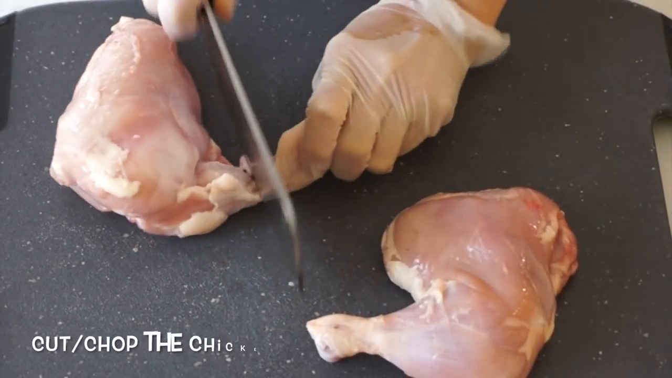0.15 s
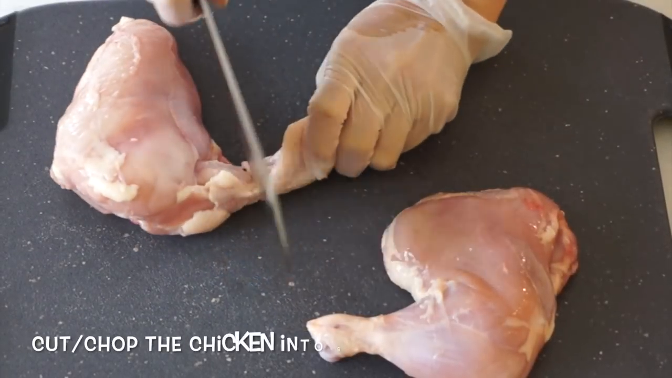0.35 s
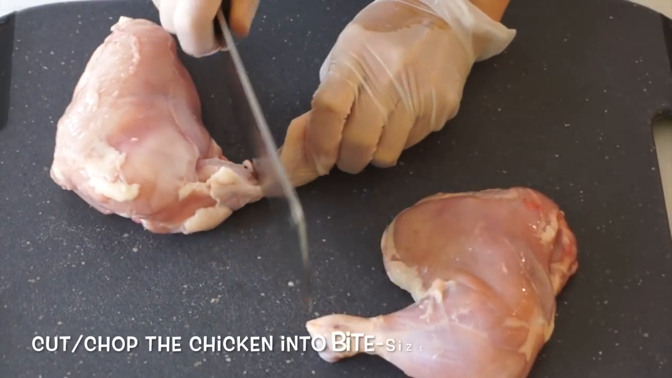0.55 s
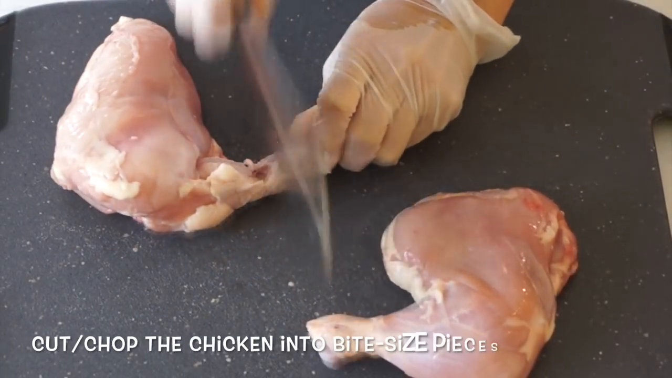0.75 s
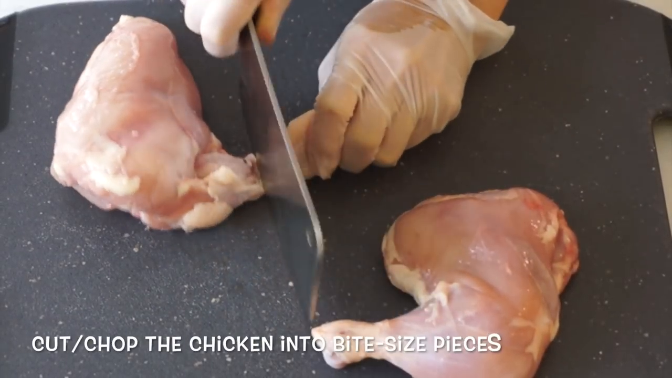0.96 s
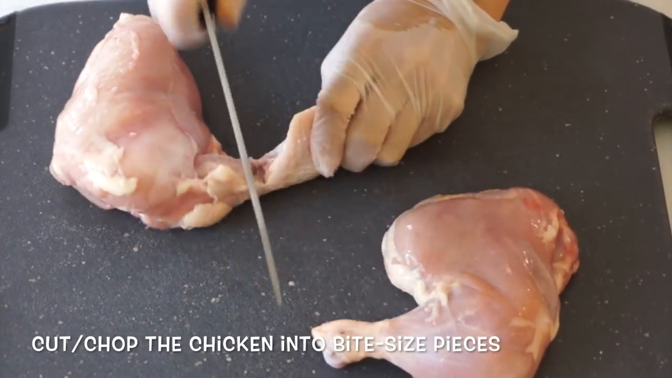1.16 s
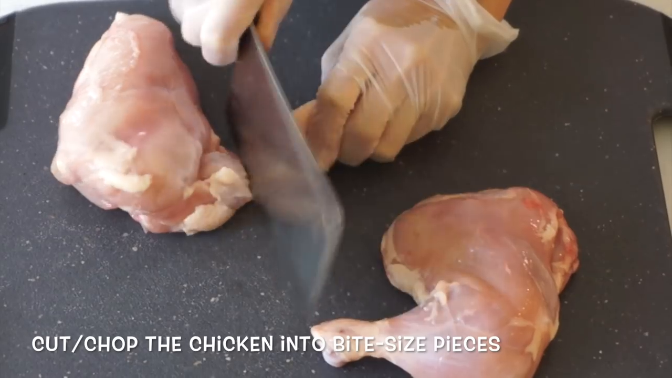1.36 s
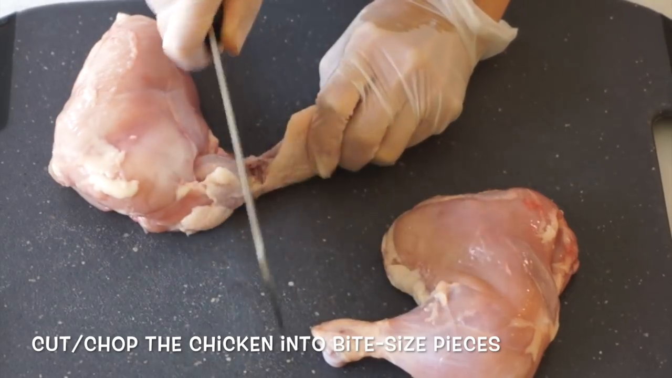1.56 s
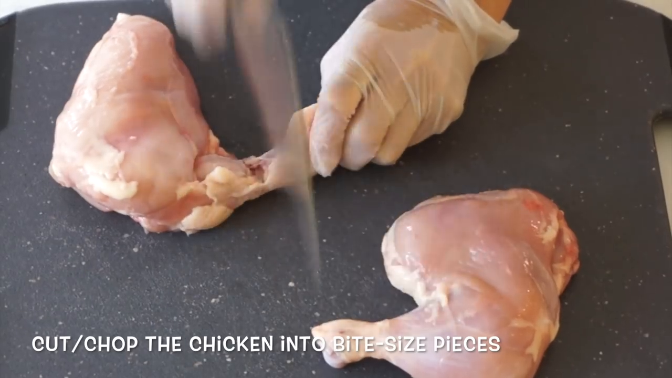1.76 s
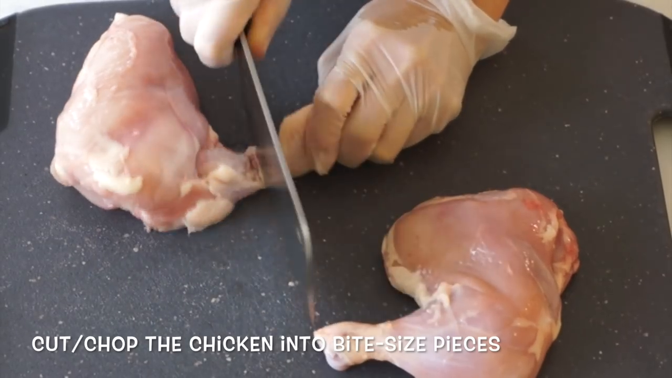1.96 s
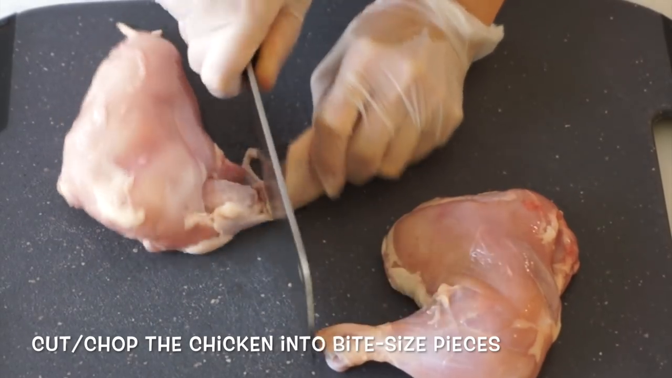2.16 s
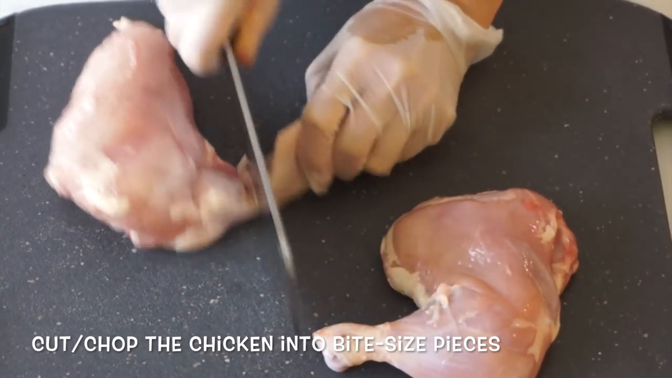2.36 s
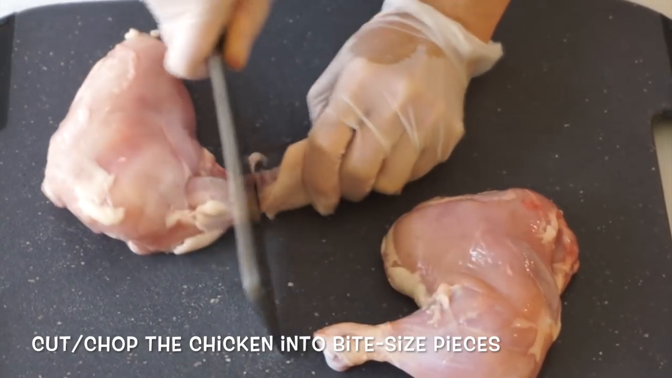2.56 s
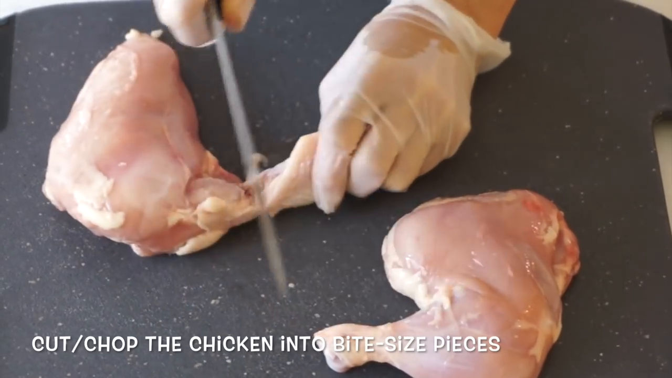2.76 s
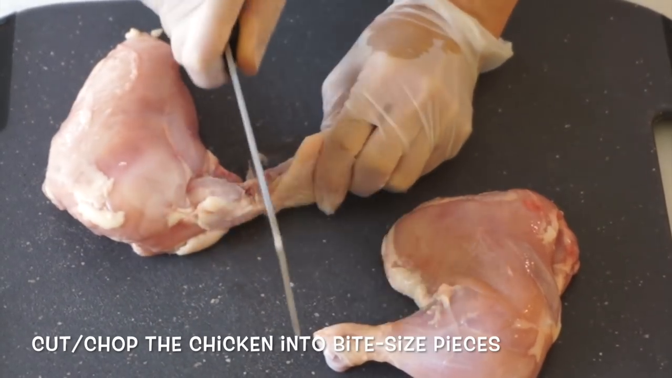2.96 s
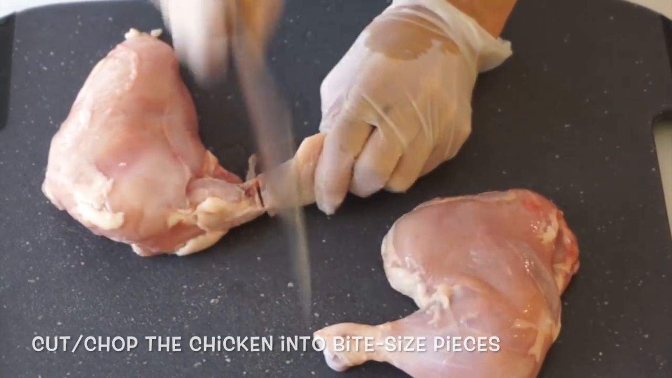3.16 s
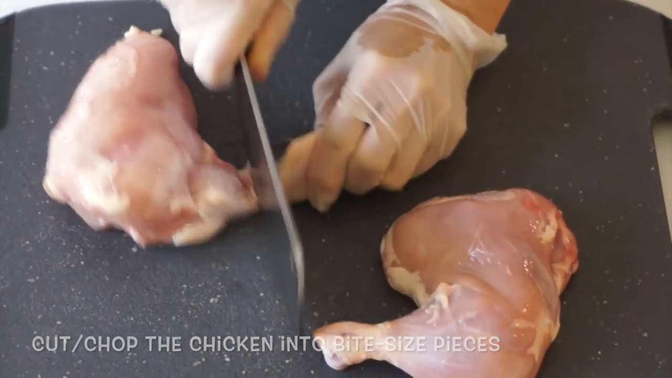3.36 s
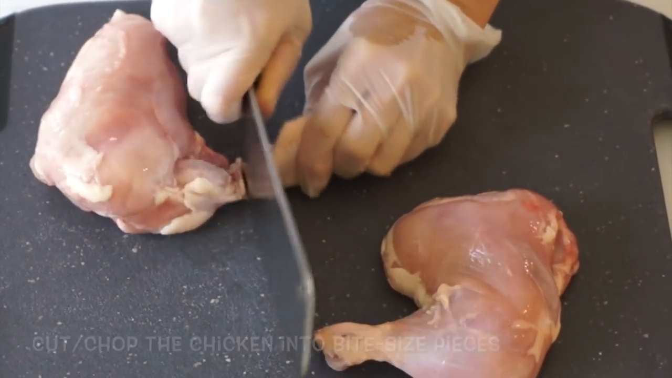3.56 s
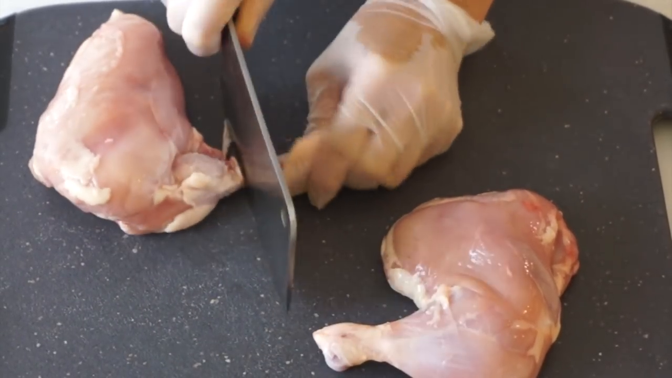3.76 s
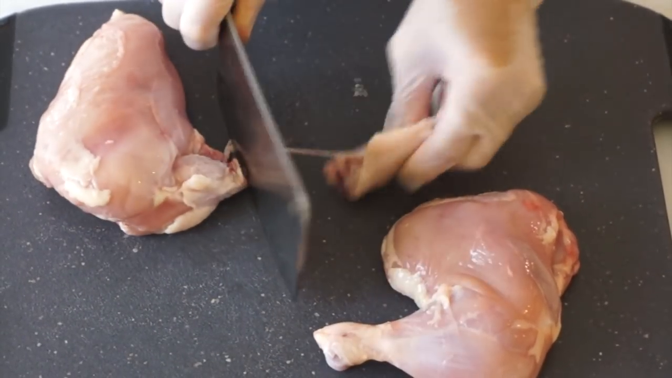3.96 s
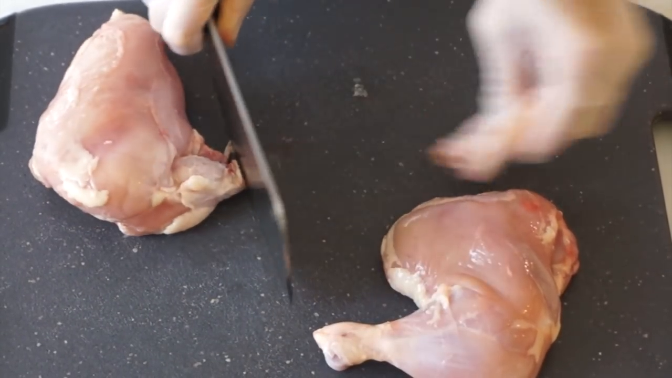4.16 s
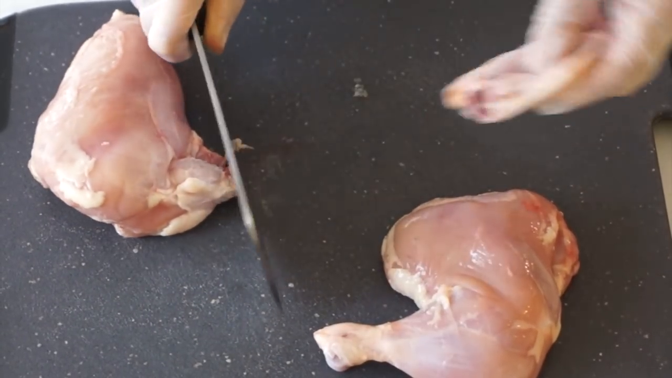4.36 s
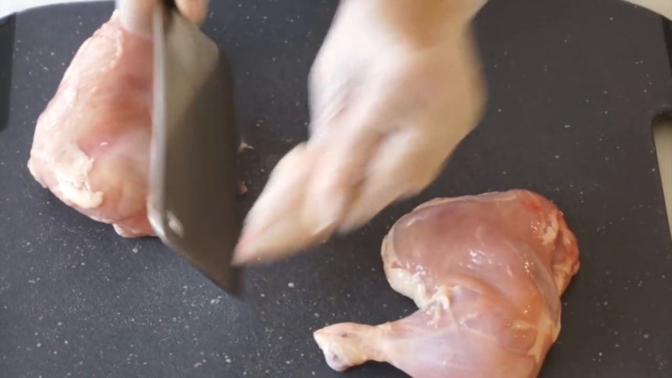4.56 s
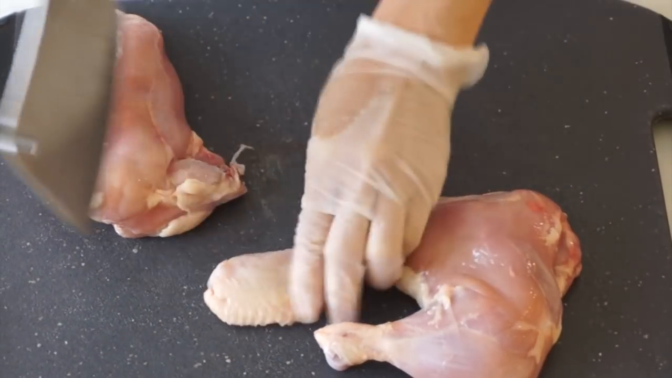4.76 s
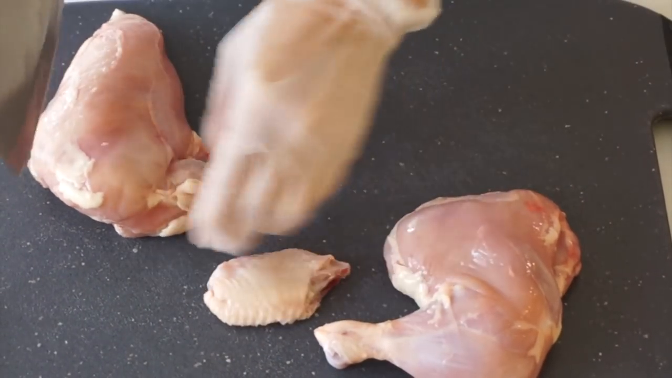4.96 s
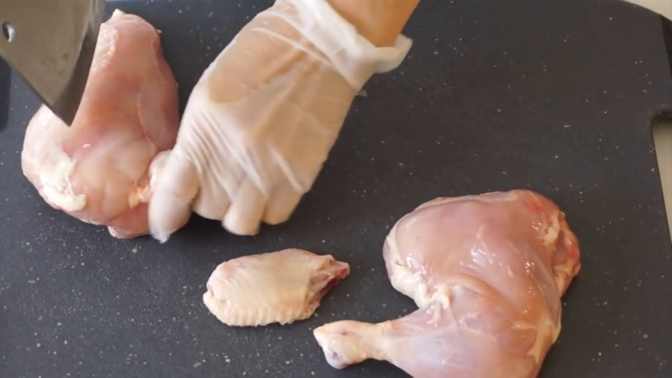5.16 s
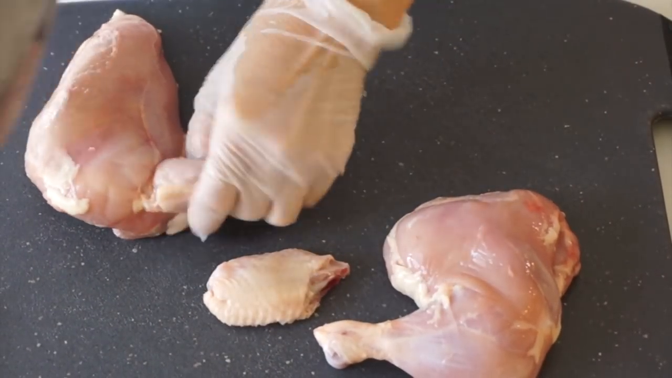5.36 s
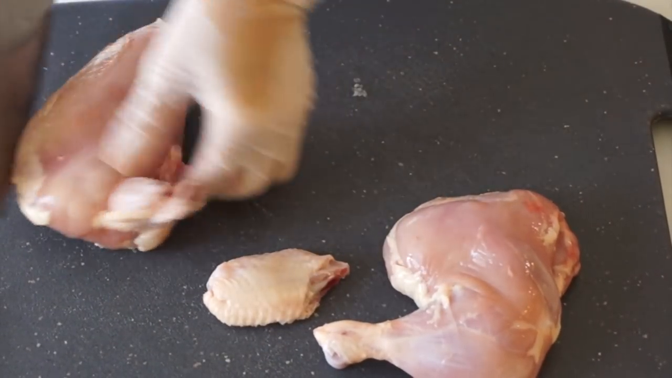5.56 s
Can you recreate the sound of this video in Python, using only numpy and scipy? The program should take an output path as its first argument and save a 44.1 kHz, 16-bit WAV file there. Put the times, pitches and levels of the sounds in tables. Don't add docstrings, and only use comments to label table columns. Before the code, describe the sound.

Six uneven cleaver blows crack and knock on a cutting board in a hard-walled kitchen, followed by quiet handling of meat with plastic gloves.

```python
import sys
import numpy as np
from scipy import signal
from scipy.fft import rfft, irfft
from scipy.io import wavfile
from scipy.ndimage import uniform_filter1d

SR = 44100
rng = np.random.default_rng(int(sys.argv[2]) if len(sys.argv) > 2 else 0)


def undo_db(level):
    steps = np.asarray(level, float) / 20
    return 10 ** steps


def dump_mix(stems):
    frames = np.atleast_2d(stems).T
    limited = np.clip(frames, -1, 1)
    pcm = np.round(limited * 32767).astype(np.int16)
    wavfile.write(sys.argv[1], SR, pcm)


N = 247401

# frequency in Hz, level in dB per Hz.
AIR = [(15, -90), (25, -57.5), (60, -50.5), (197, -20.5), (293, -10), (335, -11.5), (485, -7.5),
       (525, -11.5), (991, -12.5), (1130, -13), (2140, -23.5), (2780, -28.5), (3260, -33), (9170, -39.5),
       (14000, -38.5)]
# frequency in Hz, level in dB.
HUM = [(74, -30.5), (231, -17), (300, -10), (392, -21), (437, -9.5), (486, -3)]
# frequency in Hz, likeness from 0 to 1.
LIKENESS = [(60, 0.78), (300, .97), (700, 0.89), (1400, .8), (3000, 0.82), (6500, 0.76), (14000, 0.98)]
# peak time in seconds,
# rustle level in dB, swell in seconds, fade in seconds, scrape level in dB over the rustle.
STROKES = [(.0, -73, .1, .3, 12), (.06, -64, .03, .12, 2), (.164, -59, .16, .19, 9), (.33, -74, .2, .15, 8),
           (2.12, -71, .1, .1, 15), (2.17, -56.5, .065, .08, 4.5), (2.366, -59.5, .35, .055, 6),
           (2.42, -55, .02, .25, 5), (2.74, -74, .3, .7, 3), (3.44, -47, .03, .07, 10),
           (3.5, -48, .035, .09, 8), (3.685, -57, .14, .12, 13), (3.76, -77, .1, .3, 18),
           (3.88, -63, .1, .115, -2), (4.764, -67, .027, .165, 3), (5.062, -65.5, .035, .09, 8),
           (5.126, -51.5, .03, .14, -1), (5.24, -66, .1, .2, 5), (5.436, -55, .076, .19, -2),
           (5.61, -58, .12, .1, 4)]
# time in seconds, level in dB, swell in seconds, fade in seconds.
STRETCH = (2.216, -56.5, .012, .35)
# start in seconds, peak in dB, centre in Hz, T60 in seconds,
# width in octaves.
SNAPS = [(.061, -50, 7400, 0.026, .06), (.061, -54, 10200, 0.028, .06), (.0746, -55, 7500, .02, .1),
         (2.0234, -50, 11500, .012, .2), (2.2194, -42, 12600, 0.014, 0.23), (2.257, -56, 5500, .01, 0.17),
         (2.4127, -38.5, 10400, 0.0089, 0.29), (2.5436, -51, 11500, .01, .2),
         (3.2065, -30.5, 5930, 0.0054, 0.94), (3.2105, -35, 9100, 0.0063, .6),
         (3.4094, -46, 12000, .01, .2), (3.4296, -31, 10600, 0.01, 0.53), (3.4296, -26, 5800, 0.016, .2),
         (3.495, -36, 7400, 0.0086, .6), (3.646, -41, 11000, .008, .35), (3.6566, -44, 9000, 0.012, .2),
         (3.8437, -58, 8000, .012, .5), (4.4744, -66, 8500, .01, .15), (4.6843, -57, 12000, .01, .2),
         (4.7072, -58, 11500, .01, .25), (4.758, -61, 6000, .012, .6), (5.225, -53, 9000, .012, .5),
         (5.3153, -58, 12000, .012, .2)]
# start in seconds, peak in dB, centre in Hz,
# T60 in seconds, width in octaves.
TAPS = [(1.898, -36, 960, .04, 0.33), (1.943, -31, 885, .03, 0.57), (2.017, -42.5, 2940, .03, 0.17),
        (2.127, -44.5, 3070, 0.043, .2), (2.326, -42, 3550, 0.015, 0.35), (2.42, -50, 3600, .03, 0.35),
        (2.5225, -36.5, 1070, 0.015, 0.54), (2.53, -42, 980, 0.038, .5), (2.545, -49, 2900, .02, .15),
        (3.207, -28, 1480, 0.011, 0.45), (3.494, -37, 2900, .017, 0.28), (3.812, -53, 2800, 0.023, .25),
        (3.843, -57, 2000, .025, .3), (4.758, -50, 2200, 0.016, .6), (5.04, -54, 2500, .02, 0.41),
        (5.05, -47, 1090, .06, 0.74), (5.062, -44, 975, 0.094, 0.39), (5.08, -48, 1080, .06, .5),
        (5.375, -64, 4770, .1, .2), (5.41, -56.5, 4200, 0.23, 0.25), (4.635, -59, 2500, .015, 0.45)]
# start in seconds, level in dB, centre in Hz, T60 in seconds, width in octaves.
THUDS = [(2.44, -54, 216, 0.18, 0.22), (2.74, -53, 225, 0.081, 0.16), (3.0, -57, 190, 0.24, 0.28),
         (3.49, -48, 270, 0.058, 0.28)]
# start in
# seconds, level in dB, centre in Hz, T60 in seconds, width in octaves.
SINGING = [(.04, -68, 7450, .3, .02), (.14, -60.5, 10200, .5, .025), (1.35, -42, 4480, 0.5, 0.05),
           (3.66, -61, 10600, .25, .04), (3.85, -66, 10400, 0.29, .03),
           (3.82, -76.5, 2800, 3.0, .006), (3.82, -76, 3400, 1.2, .008)]
# start in seconds, level in dB, frequency in Hz,
# T60 in seconds.
BLADE_NOTES = [(1.35, -41, 1400, 1.3), (1.8, -41, 1398, 1.4)]
# start in seconds, peak in dB, limiter dip in dB, limiter recovery in seconds,
# decay stretch as a factor.
CHOPS = [
    (.400, -43.5, -8, 0.048, 1),
    (0.8149, -22.5, 1.5, 0.043, 0.98),
    (1.347, -13.5, 8, 0.13, 0.82),
    (1.799, -13, 12, 0.11, 0.82),
    (2.5923, -29.5, -3, 0.036, 0.8),
    (3.210, -7, 19, 0.16, 0.98),
]
# frequency in Hz, level in dB per Hz.
COLOURS = [
    [(100, -42), (440, -9), (760, -16), (1000, -13), (2050, -3), (2500, -11), (6500, -25), (14000, -38)],
    [(60, -42), (200, -11), (400, -3), (620, -6), (850, -3), (1900, -14), (5600, -36.5), (14000, -36)],
    [(50, -50), (260, -10), (420, -11), (560, 1), (909, -1.5), (1700, -5.5), (5080, -28.5), (14000, -40)],
    [(60, -66), (350, -8), (560, -13), (952, -4), (1150, -12), (2500, -19), (6000, -34), (14000, -38.5)],
    [(100, -70), (400, -9), (556, -17), (767, 2), (1000, -8), (2260, -5.5), (5500, -39), (14000, -54)],
    [(50, -62), (237, -25), (398, -4), (752, 1), (1020, -4), (2100, -.5), (5330, -16.5), (13500, -43.5)],
]
# crack in dB, crack dullness as a factor, board ring in dB, blade ring in dB.
CONTACTS = [(10.5, 1, -3, 2), (4, 0.77, -1.5, -6), (-5, 0.58, -5.5, 0), (-5.5, 1, -1.5, 0),
            (8.5, 0.85, -5, -11), (-14, 1, -12, -14.5)]
# frequency in Hz, level in dB.
WORKTOP = [(330, 0), (395, 3), (485, -7), (530, 0)]
# frequency in Hz, T60 in seconds.
ROOM_T60 = [(60, 0.33), (250, 0.23), (700, 0.46), (2000, 0.47), (5000, 0.48), (13000, 0.43)]
# frequency in Hz, level in dB, T60 in seconds.
BOARD = [(90.8, -20.5, 0.42), (535, -11, 0.16), (697, -14.5, .4), (970, -13, 0.19), (1282, -11.5, 0.3)]
# frequency in Hz, level in dB, T60 in seconds.
BLADE = [(1790, -23, 0.41), (2210, -28, 0.34)]

ROOM_TONE_DB = -53.7
DUCK_FROM_DB, DUCK_SHARE = 8, .5
DUCK_DELAY_S, DUCK_ATTACK_S, DUCK_HOLD_S_PER_DB, DUCK_RELEASE_DB_PER_S = .12, .18, .14, 6
CRINKLE_DB, LIGHT_TOUCH_DB, CRINKLE_LOSS = -2, -64, .75
FLUTTER_S, FLUTTER_DB = .0079, -6
TOP_HZ = 13650


def on_log(table, hz):
    points, values = np.transpose(table)
    return np.interp(np.log(hz + 1), np.log(points), values)


def unit(x):
    return x / np.sqrt(np.mean(x ** 2))


def stereo_noise(length, likeness=1.0):
    alike = np.clip(likeness * on_log(LIKENESS, np.fft.rfftfreq(length, 1 / SR)), 0, 1)
    mid, side = rfft(rng.standard_normal((2, length)))
    mid, side = mid * np.sqrt(1 + alike), side * np.sqrt(1 - alike)
    return np.array([mid + side, mid - side])


def bell(length, hz, octaves):
    distance = np.log2((np.fft.rfftfreq(length, 1 / SR) + 1) / hz)
    return np.exp(-.5 * (distance / octaves) ** 2)


def add(out, x, s):
    i = int(s * SR)
    out[:, i:i + x.shape[-1]] += x[..., :N - i]


def walk(rate):
    k = int(SR / rate)
    held = np.repeat(rng.standard_normal(N // k + 1), k)
    return 1.25 * uniform_filter1d(held, k)[:N]


def ducking():
    total = 0
    for s, _, dip_db, *_ in CHOPS:
        depth = DUCK_SHARE * max(dip_db - DUCK_FROM_DB, 0)
        t = np.arange(N) / SR - s - DUCK_DELAY_S
        hold = DUCK_ATTACK_S + DUCK_HOLD_S_PER_DB * depth
        back = DUCK_RELEASE_DB_PER_S * np.maximum(t - hold, 0)
        total = total - np.maximum(depth * np.clip(t / DUCK_ATTACK_S, 0, 1) - back, 0)
    return total


def kitchen():
    t, hz = np.arange(N) / SR, np.fft.rfftfreq(N, 1 / SR)
    air = unit(irfft(stereo_noise(N) * undo_db(on_log(AIR, hz)), N))
    hum = 0
    for f, db in HUM:
        hum = hum + undo_db(db + 1.8 * walk(7)) * np.sin(2 * np.pi * f * t + 0.78 * walk(13))
    return (air + hum) * undo_db(ROOM_TONE_DB + ducking())


def stroke(s, db, swell, fade):
    t = np.arange(N) / SR - s
    return undo_db(db - 20 * np.maximum(-t / swell, t / fade))


def rustle():
    power = np.array([[0], [1], [0]]) * stroke(*STRETCH) ** 2
    for s, db, swell, fade, scrape_db in STROKES:
        crinkle_db = CRINKLE_DB - CRINKLE_LOSS * max(db - LIGHT_TOUCH_DB, 0)
        balance = undo_db(np.array([[0], [crinkle_db], [scrape_db]]))
        power = power + (balance * stroke(s, db, swell, fade)) ** 2
    gains = np.sqrt(power)
    scrape_shape = bell(N, 2540, 0.79) + 1.3 * bell(N, 880, 0.5)
    shapes = bell(N, 7100, 0.73), bell(N, 12400, 0.26), scrape_shape
    ripple = uniform_filter1d(rng.standard_normal(N // 2 + 1), size=300)
    folds = undo_db(45.0 * uniform_filter1d(ripple, size=300))
    grain = undo_db(1) * 0 + walk(400)
    grains = grain, grain, walk(150) + 0.17 * grain
    out = 0
    for gain, shape, grain_db in zip(gains, shapes, grains):
        out = out + gain * unit(irfft(stereo_noise(N) * shape * folds, N) * undo_db(grain_db))
    return out


def ticks(rows, trail_db, size=8192):
    out, t = np.zeros((2, N)), np.arange(size) / SR
    for s, db, hz, t60, octaves in rows:
        burst = unit(irfft(stereo_noise(size) * bell(size, hz, octaves)))
        trail = undo_db(trail_db) * 1000 ** (-t / .5) * (1 - t / t[-1])
        onset = np.minimum(t * hz, 1)
        add(out, undo_db(db) * burst * onset * (1000 ** (-t / t60) + trail), s)
    return out


def blade_notes(size=40000):
    out, t = np.zeros((2, N)), np.arange(size) / SR
    for s, db, hz, t60 in BLADE_NOTES:
        add(out, undo_db(db) * np.sin(2 * np.pi * hz * t) * 1000 ** (-t / t60), s)
    return out


def rings(modes, colour, t):
    chance = np.clip(rng.standard_normal((len(modes), 2)), -1.2, 1.2)
    out = 0
    for (f, db, t60), (a, b) in zip(modes, chance):
        level = undo_db(db + 4.3 * a + .5 * on_log(colour, f))
        out = out + level * np.sin(2 * np.pi * f * (1 + 0.0022 * b) * t) * 1000 ** (-t / t60)
    return out


def room_tail(echoes, stretch, t):
    tail = 0
    for centre in 45 * 2 ** np.arange(0, 8.6, .5):
        t60 = stretch * on_log(ROOM_T60, centre)
        next_room = undo_db(-35.5) * min(centre / 3000, 1) * 1000 ** (-t / 1.4)
        fade = 1000 ** (-t / t60) + next_room
        tail = tail + irfft(echoes * bell(len(t), centre, .22)) * fade / np.sqrt(t60)
    tail = tail / np.sqrt(np.mean(tail[:, :2000] ** 2))
    tail = tail * (1 - np.exp(-t / 0.001)) * (1 - 0.66 * np.exp(-t / 0.027))
    return tail * undo_db(1.13 * walk(250)[:len(t)])


def bone_crack(contact, t):
    crack = unit(irfft(contact)) * (1 - np.exp(-t / 0.00038)) * np.exp(-t / 0.0027)
    crack = signal.sosfilt(signal.butter(3, 250, "high", fs=SR, output="sos"), crack)
    lag = int(FLUTTER_S * SR)
    feedback = np.r_[1, np.zeros(lag - 1), -undo_db(FLUTTER_DB)]
    crack = signal.lfilter([1], feedback, crack[:, :6000])
    return np.pad(crack, ((0, 0), (0, len(t) - 6000)))


def chop(colour, dip_db, recovery, stretch, crack_db, dull, board_db, blade_db, size=40000):
    t, hz = np.arange(size) / SR, np.fft.rfftfreq(size, 1 / SR)
    modes = undo_db(6.8 * uniform_filter1d(rng.standard_normal(len(hz)), size=21))
    echoes = stereo_noise(size, 0.97) * undo_db(on_log(colour, hz) + on_log(WORKTOP, hz)) * modes
    contact = stereo_noise(size, 1.14) * undo_db(dull * on_log(colour, hz))
    tail = room_tail(echoes, stretch, t)
    crack = bone_crack(contact, t)
    ring = undo_db(board_db) * rings(BOARD, colour, t) + undo_db(blade_db) * rings(BLADE, colour, t)
    ring = undo_db(6.5) * ring * (1 - np.exp(-t / .006))
    limiter = undo_db(-dip_db * np.clip(1 - t / recovery, 0, 1) ** 1.37)
    return (tail + ring) * limiter + undo_db(crack_db + 3) * crack


def cleaver():
    out = np.zeros((2, N))
    for (s, db, *hold), contact, colour in zip(CHOPS, CONTACTS, COLOURS):
        add(out, undo_db(db) * chop(colour, *hold, *contact), s)
    return out


def scene():
    contacts = ticks(SNAPS, -35) + ticks(TAPS, -15.5) + ticks(THUDS, -21)
    singing = ticks(SINGING, -40, size=32768)
    return cleaver() + blade_notes() + contacts + singing + rustle() + kitchen()


def roll_off(x):
    return signal.sosfilt(signal.butter(12, 14910, fs=SR, output="sos"), x)


def record(dry):
    rounded = np.tanh(2.44 * dry) / 2.548
    cut = signal.ellip(10, .2, 60, TOP_HZ, fs=SR, output="sos")
    return roll_off(signal.sosfilt(cut, rounded))


dry = scene()
out = record(dry)
dump_mix(out)
```